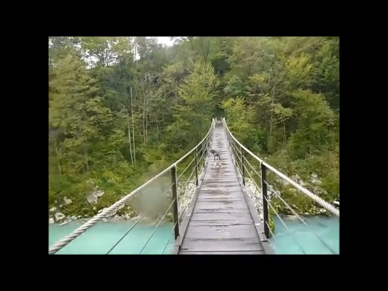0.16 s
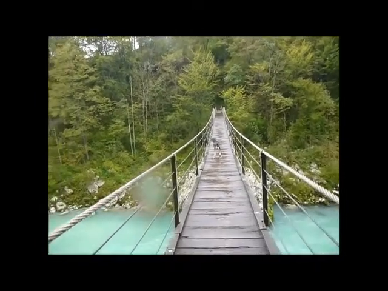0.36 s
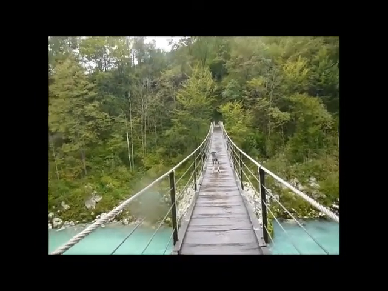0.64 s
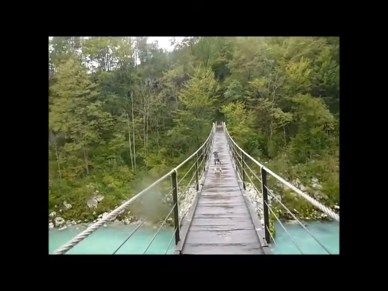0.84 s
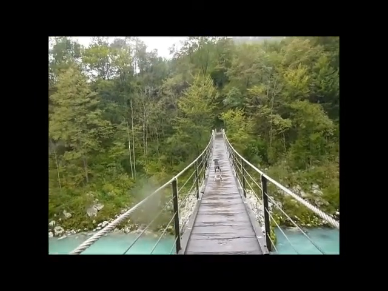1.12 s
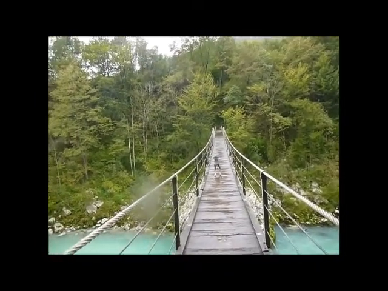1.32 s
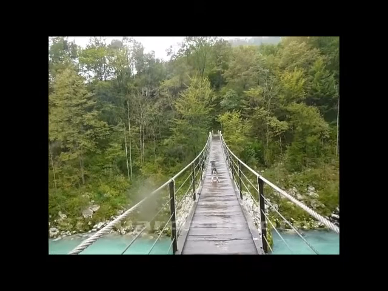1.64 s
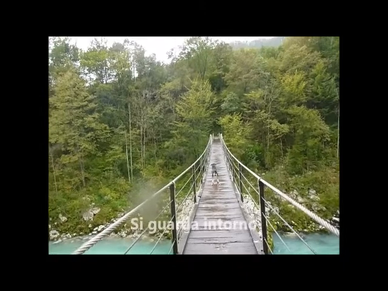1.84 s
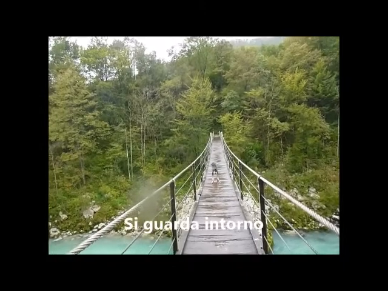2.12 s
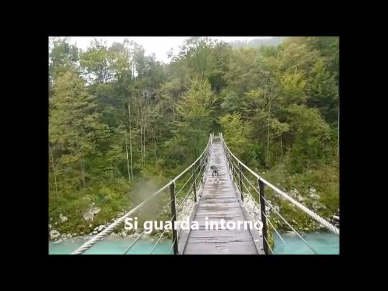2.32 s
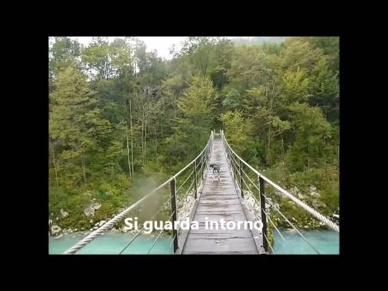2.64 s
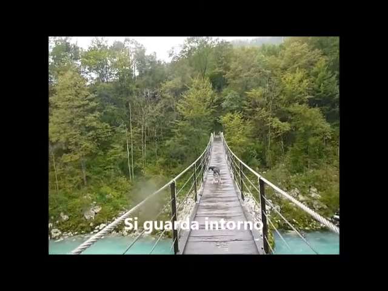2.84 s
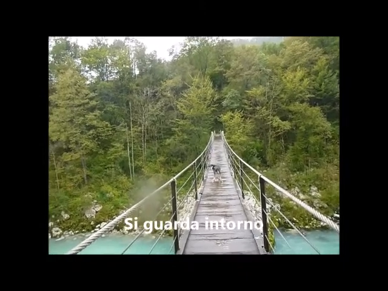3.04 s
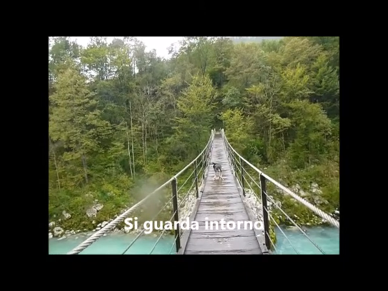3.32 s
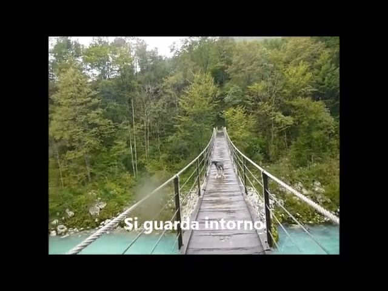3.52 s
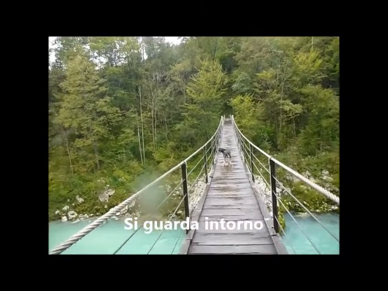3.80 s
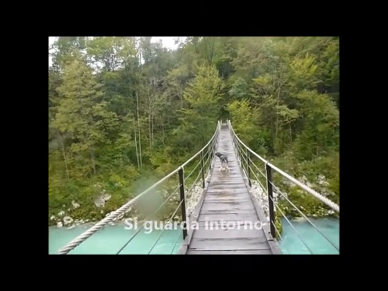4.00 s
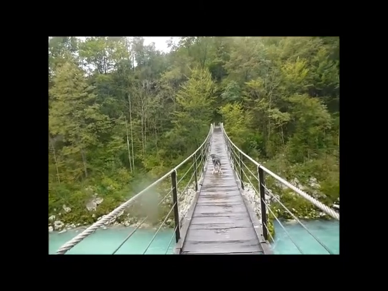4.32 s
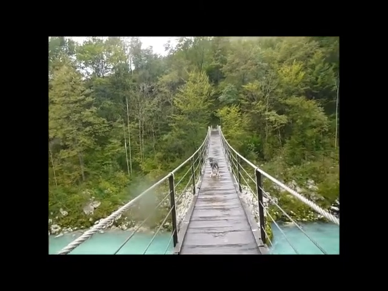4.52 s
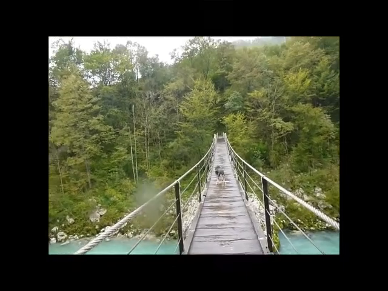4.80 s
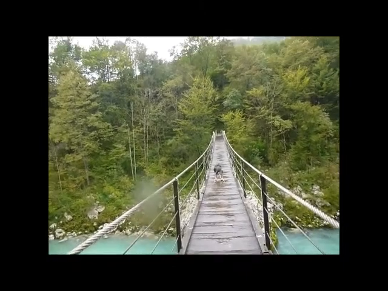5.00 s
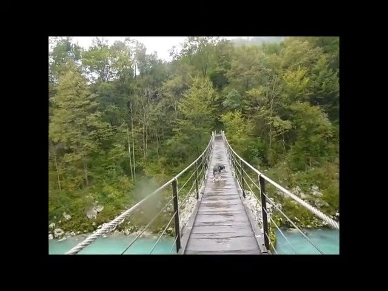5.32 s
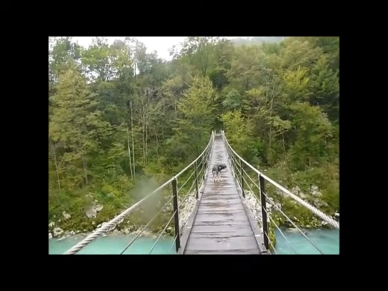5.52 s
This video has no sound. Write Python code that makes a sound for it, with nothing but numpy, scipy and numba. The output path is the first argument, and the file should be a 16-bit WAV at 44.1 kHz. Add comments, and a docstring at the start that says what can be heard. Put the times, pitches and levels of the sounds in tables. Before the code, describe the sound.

Steady rushing water with crisp nearby rain ticks, soft handling thuds and brief treble dropouts, then a hard click at the close.

```python
"""River below a footbridge in light rain

A fast river rushes over rocks in a wooded valley: swarms of bubble tones and shaped noise merge into a roar.
Raindrops tick on a camera and its holder (noise bursts with dull knocks), and its body takes soft thuds.
The treble drops out for instants while thin steady tones linger in some of the gaps.
Near the end a sharp click rings the casing (fading tones) and makes the gain control duck."""
import sys
import numpy as np
from scipy import signal
from scipy.fft import rfft, irfft
from scipy.io import wavfile
from scipy.ndimage import uniform_filter1d
from numba import njit

SR = 44100
rng = np.random.default_rng(int(sys.argv[2]) if len(sys.argv) > 2 else 0)


def file_out(sig):
    """Save sig as 16-bit WAV at sys.argv[1]."""
    # one column per channel
    cols = np.atleast_2d(sig).T
    # limit, then scale
    lim = np.clip(cols, -1, 1)
    pcm = np.round(lim * 32767).astype(np.int16)
    wavfile.write(sys.argv[1], SR, pcm)


N = 249606


def undb(db):
    """Turns decibels into a gain."""
    return 10 ** (np.asarray(db) / 20)


def unit(x):
    """Scales a sound to an rms level of 1."""
    return x / np.sqrt(np.mean(x ** 2))


def walk(rate_hz):
    """A smooth random wander, from random steps averaged twice; its spread is near 1."""
    step = int(SR / rate_hz)
    held = np.repeat(rng.standard_normal(N // step + 1), step)
    smooth = uniform_filter1d(uniform_filter1d(held, step), step)
    return 1.5 * smooth[:N]


def add(out, start_s, sound):
    """Mixes a short sound in at its start time."""
    i = int(start_s * SR)
    out[i:i + len(sound)] += sound[:N - i]


def butter(order, hz, kind, x):
    """Filters a sound: "high" keeps what lies above hz, "band" what lies between two pitches."""
    return signal.sosfilt(signal.butter(order, hz, kind, fs=SR, output="sos"), x)


# Thin tones heard around some dropouts: middle_s, pitch_hz, peak_db, length_ms
THIN_TONES = [(0.242, 2100, -44, 40), (0.24, 2460, -44, 36), (0.25, 2300, -44, 40), (0.247, 2720, -48, 40),
              (0.249, 3400, -53, 30), (1.11, 3430, -50, 40), (1.32, 1700, -43, 40), (1.326, 3050, -49, 45),
              (1.339, 3800, -50, 41), (1.339, 4130, -50, 39), (3.627, 3350, -50, 35),
              (4.521, 2200, -46, 35), (4.521, 3520, -49, 35), (4.824, 3300, -48, 35)]


def thin_tones():
    """Brief tones of steady pitch that swell and fade."""
    t = np.arange(N) / SR
    out = np.zeros(N)
    for middle_s, hz, db, length_ms in THIN_TONES:
        swell = np.cos(np.pi * np.clip(1000 * (t - middle_s) / length_ms, -.5, .5))
        out += undb(db) * np.sin(2 * np.pi * hz * t) * swell
    return out


# Soft thuds through the camera body: middle_s, peak_db (before the bass cut), pitch_hz
BODY_THUDS = [(0.59, -49, 120), (0.971, -48, 125), (1.002, -46, 120), (1.154, -50, 105), (1.19, -49, 100),
              (1.233, -48, 90), (2.061, -49, 110), (2.14, -50, 105), (2.232, -50, 120), (2.287, -50, 125),
              (2.324, -50, 105), (2.441, -52, 110), (2.688, -46, 95), (2.733, -41, 130), (2.918, -41, 110),
              (2.938, -40, 151), (3.0272, -23, 225), (4.367, -51, 125), (5.337, -54, 55)]


def thuds(turns=2.4, bass_hz=60):
    """A soft push on the body swings it back and forth a little over twice, most strongly in the middle."""
    out = np.zeros(N)
    for middle_s, db, hz in BODY_THUDS:
        swings = np.arange(int(turns * SR / hz)) * hz / SR
        swell = np.sin(np.pi * swings / turns) ** 2
        push = np.cos(2 * np.pi * (swings - turns / 2)) * swell
        add(out, middle_s - turns / hz / 2, undb(db) * push)
    # run forwards and backwards, so that the bass cut does not delay the thuds
    return signal.sosfiltfilt(signal.butter(1, bass_hz, "high", fs=SR, output="sos"), out)


# Tones at which the casing rings: pitch_hz, width_hz (wider dies faster; damping scales it), level_db (relative)
CASING_TONES = [(330, 280, -8.5), (660, 430, -5), (1210, 470, -7.5), (2340, 360, -3.5), (3280, 290, -5.5),
                (4020, 620, -4.5), (5270, 670, -3), (6350, 560, -5), (7500, 580, -17), (8820, 550, 0),
                (10480, 620, -5.5), (11600, 390, -11), (12100, 700, -9.5), (13200, 510, -10),
                (14050, 550, -9), (15000, 600, -13), (15900, 600, -20)]
# Where the casing hardly gives off sound: pitch_hz, width_hz
CASING_GAP = (4870, 900)


def click(start_s=5.4499, energy_db=11.5, tail_db=-30, tail_ms=13, swell=0.64, damping=1.38):
    """A snap makes the casing ring at many pitches, which swell for an instant and die; a faint hiss trails."""
    t = np.arange(2000) / SR
    snap = np.zeros(len(t))
    for k, (hz, width, db) in enumerate(CASING_TONES):
        fade = (width * t) ** swell * np.exp(-damping * np.pi * width * t)
        # neighbouring tones start in opposite directions
        snap += (-1) ** k * undb(db) * width * np.sin(2 * np.pi * hz * t) * fade
    gap_hz, gap_width = CASING_GAP
    snap = signal.lfilter(*signal.iirnotch(gap_hz, gap_hz / gap_width, fs=SR), snap)
    snap = undb(energy_db) * snap / np.linalg.norm(snap)
    hiss = butter(3, [2500, 11000], "band", rng.standard_normal(len(t)))
    tail = undb(tail_db) * hiss * np.exp(-1000 * t / tail_ms)
    out = np.zeros(N)
    add(out, start_s, snap + tail)
    return out


# Raindrops close by: start_s, tick_db (energy scale), treble_db (against the rest of the tick),
# knock_hz (pitch of the dull knock under it), knock_db (peak scale of the knock)
NEAR_DROPS = [(0.055, -23, -3, 2000, -30), (0.1415, -15.5, 1, 1300, -41), (0.1745, -28, 4, 1300, -43),
              (0.7766, -22, -1, 1300, -40), (1.1512, -15.5, -1, 2000, -34), (1.1805, -23, -5, 2000, -40),
              (1.2336, -26, -10, 3500, -36), (1.2807, -18, -2, 2500, -35), (2.0295, -22, -14, 2600, -26),
              (2.0584, -16, 1, 1300, -34), (2.0675, -14.5, -2, 1300, -34), (2.187, -28, -4, 3630, -28),
              (2.2111, -25, -2, 3000, -35), (2.855, -18.5, -3, 1300, -40), (3.0626, -16.5, 4, 1000, -35),
              (3.4833, -20, -12, 1520, -20), (3.5305, -22, -1, 1300, -35), (3.5992, -18, 0, 1300, -30),
              (3.7409, -23, -2, 1300, -31), (4.016, -18, -2, 2000, -28), (4.1815, -28, -8, 2100, -26.5),
              (4.2328, -21, 0, 2000, -36), (4.371, -21, 4.5, 1900, -23), (4.3888, -30, -8, 3200, -29),
              (4.8407, -20, -4, 1300, -29), (4.8603, -21, 0, 1300, -34), (4.8716, -17, 0, 1300, -37),
              (4.9079, -21, 4, 1300, -44), (5.3333, -9.5, -12, 1390, -20)]


def rain(tick_ms=0.56, knock_turns=0.68, faint_db=-38, faint_hz=2200, scatter_db=3.0, split_hz=7500):
    """Each drop is a crisp burst of splash noise and a dull, quickly damped knock."""
    out, t = np.zeros(N), np.arange(300) / SR
    drops = list(NEAR_DROPS)
    for when, luck, dull in rng.random((90, 3)):  # fainter drops fall at random
        level_db = faint_db - scatter_db * np.log(1 - .95 * luck)
        drops.append((when * N / SR, level_db, -12 * dull, faint_hz, -44))
    for start_s, tick_db, treble_db, hz, knock_db in drops:
        burst = rng.standard_normal(len(t)) * np.exp(-1000 * t / tick_ms)
        low = butter(2, [3200, split_hz], "band", burst)
        high = butter(2, [split_hz, 14200], "band", burst)
        low, high = low / np.linalg.norm(low), high / np.linalg.norm(high)
        tick = (low + undb(treble_db) * high) / np.sqrt(2)
        age = hz * t / knock_turns
        knock = -np.sin(2 * np.pi * hz * t) * age * np.exp(1 - age)
        add(out, start_s, undb(tick_db) * tick + undb(knock_db) * knock)
    return out


@njit
def ring(start, hz, cycles, size, glide, n):
    """Each bubble is a decaying tone that rises in pitch as it nears the surface."""
    out = np.zeros(n)
    for k in range(len(start)):
        length = int(cycles[k] * SR / hz[k])
        # a shrinking arrow turns round and round; its height is the sound
        arrow = size[k] + 0j
        step = np.exp((2j * np.pi - 5 / cycles[k]) * hz[k] / SR)
        speed_up = np.exp(2j * np.pi * glide * hz[k] / SR / length)
        for i in range(start[k], min(n, start[k] + length)):
            out[i] += arrow.imag
            arrow, step = arrow * step, step * speed_up
    return out


def bubbles(low_hz, high_hz, cycles, scatter_db, count):
    """A swarm of bubbles at random times, pitches spread evenly in octaves, a few much louder than most."""
    when, pitch, luck, length = rng.random((count, 4)).T
    size = undb(-scatter_db * np.log(1 - luck))
    hz = low_hz * (high_hz / low_hz) ** pitch
    return ring((when * N).astype(np.int64), hz, cycles * (.5 + length), size, 0.22, N)


# Tone colour of the water: pitch_hz, level_db (per hertz, relative)
WATER_COLOUR = [(15, -55), (30, -37), (70, -30.5), (126, -22.5), (200, -10.5), (350, -0.5), (705, -1),
                (1250, -4), (2370, -11), (3270, -17), (5170, -22.5), (9610, -27.5), (12900, -31),
                (15600, -31.5)]
# Level of the whole roar over time: time_s, level_db (rms scale)
ROAR_LEVEL = [(0, -35.5), (0.5, -35), (2.5, -35), (4.7, -35.5), (5.4, -36)]


def river(sway_db=-0.23, near_db=0.02, flicker_db=1.0, bass_flicker_db=3.5, bass_hz=140, bubble_share=0.29):
    """Bubbles and far white water; half-octave bands each flicker on their own, with barely any shared surge."""
    swarm = bubbles(199.3, 2485, 12.5, 1.44, count=12000)
    swarm = swarm + 1.4 * bubbles(2150, 12300, 3.6, 2.14, count=20000)
    f = np.fft.rfftfreq(N, 1 / SR) + 1
    spec = rfft(swarm)
    # even out the swarm's tone colour, so that the table alone sets it
    spec = spec / np.sqrt(uniform_filter1d(np.abs(spec) ** 2, size=2000) + 1e-9) * (f > 150)
    hiss = rfft(rng.standard_normal(N)) / np.sqrt(N)
    share = bubble_share * (f > 150)  # below this there is only hiss
    hz, db = np.transpose(WATER_COLOUR)
    colour = undb(np.interp(np.log(f), np.log(hz), db))
    water = (np.sqrt(share) * spec + np.sqrt(1 - share) * hiss) * colour

    centres = np.arange(9, 29) / 2  # band middles, in octaves above 1 Hz
    sway, near = walk(5.03), [walk(12) for _ in range(6)]
    place = np.clip(np.log2(f), centres[0], centres[-1])
    out = np.zeros(N)
    for k, centre in enumerate(centres):
        band = irfft(water * np.clip(1 - 2 * np.abs(place - centre), 0, 1), N)
        # a trace of wander in common with the neighbouring bands
        shared = sum(w * max(0, 1 - abs(k / 4 - j)) for j, w in enumerate(near))
        if 2 ** centre < bass_hz:  # the bass flickers slower and wider
            flicker = bass_flicker_db * walk(9.0)
        else:
            flicker = flicker_db * walk(24.95)
        out += band * undb(sway_db * sway + near_db * shared + flicker)
    return unit(out) * undb(np.interp(np.arange(N) / SR, *np.transpose(ROAR_LEVEL)))


# Instants when the treble drops out: middle_s, depth_db, hold_ms (time at the bottom), edge_hz (lower edge)
TREBLE_DROPOUTS = [(0.246, -37, 19, 1770), (0.363, -15, 1, 2700), (0.555, -20, 1, 2900),
                   (1.109, -17, 1, 2400), (1.333, -50, 21, 2700), (1.643, -15, 1, 2800),
                   (1.75, -13, 1, 2900), (1.945, -11, 1, 2900), (2.09, -19, 1, 2900), (2.197, -18, 1, 2900),
                   (2.795, -19, 1, 2900), (3.627, -15, 1, 2900), (3.968, -18, 2, 2900),
                   (4.075, -17, 1, 2900), (4.523, -14, 1, 1500), (4.821, -16, 1, 2700),
                   (5.077, -18, 1, 2900), (5.376, -16, 2, 2900)]


def dropouts(x, high_hz=14800, mids_hz=1400, mids_share=0.12, fade_ms=14.6):
    """The treble fades out and back in at each dropout; the upper mids dip with it by a share."""
    f, t = np.fft.rfftfreq(N, 1 / SR), np.arange(N) / SR
    spec, out = rfft(x), x
    for middle_s, db, hold_ms, edge_hz in TREBLE_DROPOUTS:
        part = (f > mids_hz) * (f <= high_hz) * np.where(f > edge_hz, 1, mids_share)
        lost = irfft(spec * part, N)
        away = np.clip((1000 * np.abs(t - middle_s) - hold_ms / 2) / fade_ms, 0, 1)
        out = out - lost * (1 - undb(db)) * np.cos(np.pi / 2 * away) ** 2
    return out


def scene(rain_bass_hz=300, click_bass_hz=230, roar_top_hz=15750):
    """One microphone feeds both channels; small light blows carry little bass."""
    drops = butter(2, rain_bass_hz, "high", rain())
    snap = butter(2, click_bass_hz, "high", click())
    roar = signal.sosfilt(signal.ellip(10, .2, 70, roar_top_hz, fs=SR, output="sos"), river())
    # the dropouts touch only the river and the rain
    mid = dropouts(roar + drops) + thin_tones() + thuds() + snap
    return np.array([mid, mid])


@njit
def follow(x, attack, release):
    """Follows the peaks of a sound: quick up, slow down."""
    level, y = 0., np.empty(len(x))
    for i in range(len(x)):
        level += (x[i] - level) * (attack if x[i] > level else release)
        y[i] = level
    return y


# Narrow bands missing from the sound: pitch_hz, width_hz
MISSING_BANDS = [(2898, 220), (7830, 75), (11620, 1000), (11730, 350), (11700, 310)]


def record(dry, top_db=-20, ratio=2.1, attack_ms=1.54, lag_ms=1.7, release_s=0.96, top_hz=16769):
    """Gain control ducks just after loud peaks and recovers slowly; narrow cuts and a steep top cut follow."""
    peak = follow(np.abs(dry).max(axis=0), 1000 / (attack_ms * SR), 1 / (release_s * SR))
    peak = np.interp(np.arange(N) - lag_ms * SR / 1000, np.arange(N), peak)  # it reacts a little late
    gain = np.minimum(1, undb(top_db) / (peak + 1e-9)) ** (1 - 1 / ratio)
    out = np.tanh(1.45 * dry * gain) / 1.45  # the input stage rounds the loudest peak
    for hz, width in MISSING_BANDS:
        out = signal.lfilter(*signal.iirnotch(hz, hz / width, fs=SR), out)
    return signal.sosfilt(signal.cheby2(14, 60, top_hz, fs=SR, output="sos"), out)


dry = scene()
out = record(dry)
file_out(out)
```